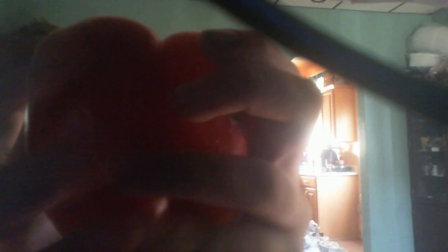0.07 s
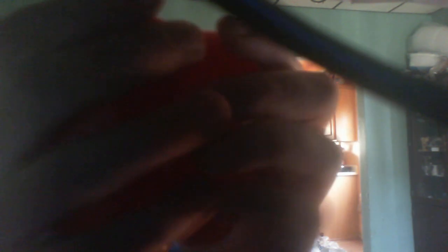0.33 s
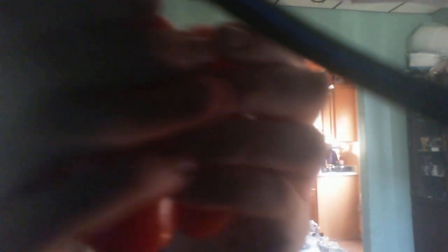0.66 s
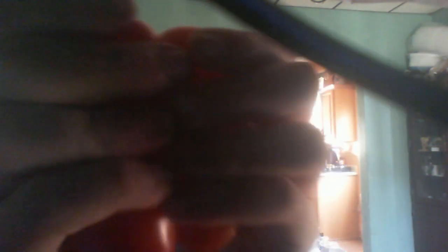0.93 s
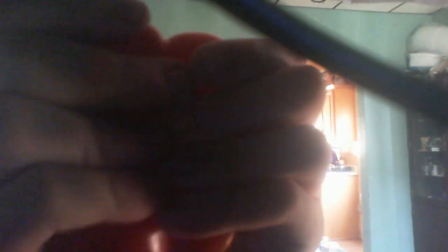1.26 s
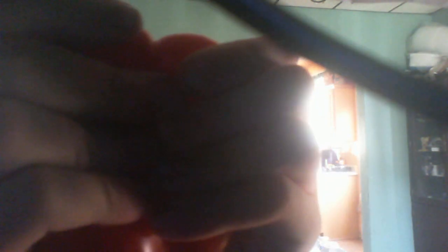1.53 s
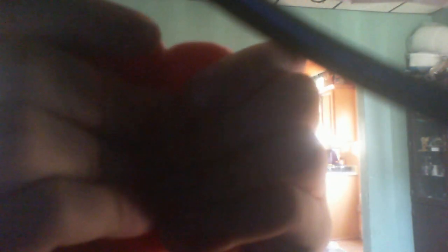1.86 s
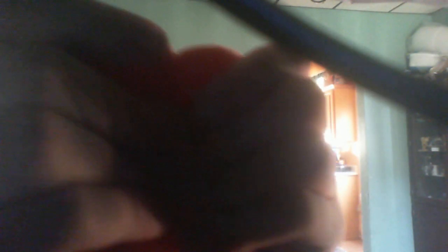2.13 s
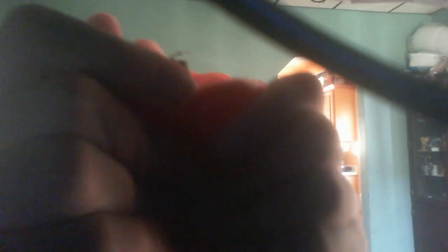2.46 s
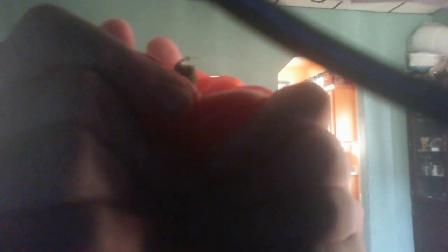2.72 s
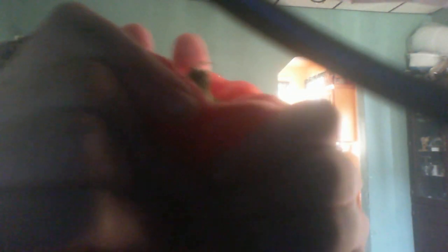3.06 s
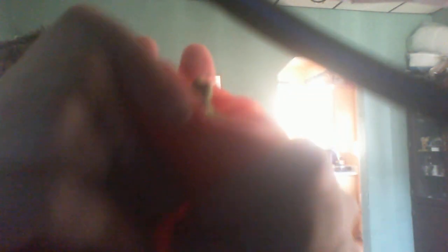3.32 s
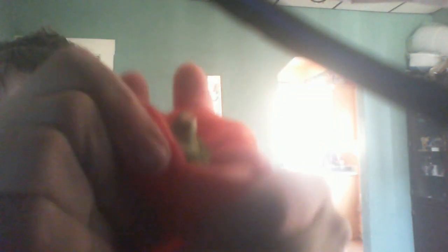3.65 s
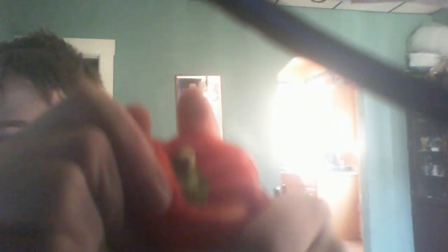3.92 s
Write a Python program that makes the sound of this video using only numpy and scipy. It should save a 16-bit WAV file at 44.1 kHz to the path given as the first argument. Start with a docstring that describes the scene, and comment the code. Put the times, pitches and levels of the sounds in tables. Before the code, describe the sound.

A bell pepper is crushed by hand close to the microphone. After near silence, soft handling rumble and quiet room tone with a faint hum and whine begin at 0.4 seconds. Sparse ticks grow from 1.2 seconds into fine crackling with small hollow cracks. At about 3.2 seconds the pepper rips with one loud snap. Wetter crackles follow, then a brief finger rub and a last crack near 4 seconds.

```python
"""Crushing a bell pepper

Two hands crush a bell pepper close to a small microphone in a quiet room. Its cells burst in a fine
crackle, fibres crack and knock the hollow inside, and the wall finally rips with one loud snap.
The hands rumble softly over room tone, a low electrical hum and a faint whine."""
import sys
import numpy as np
from scipy import signal
from scipy.fft import rfft, irfft, next_fast_len
from scipy.io import wavfile
from scipy.ndimage import map_coordinates

SR = 44100
rng = np.random.default_rng(int(sys.argv[2]) if len(sys.argv) > 2 else 0)


def materialize(psi):
    """Save the field psi as 16-bit PCM at rate SR to the path in sys.argv[1].

    A 1-D psi becomes a single channel; in a 2-D psi each row is a channel.
    """
    bounded = np.clip(np.atleast_2d(psi).T, -1, 1)
    quanta = np.round(bounded * 32767).astype(np.int16)
    wavfile.write(sys.argv[1], SR, quanta)


N = 176400

# tone of the quiet room (frequency [Hz], gain [dB])
ROOM_TONE = [(130, -1), (200, -13), (560, -16.5), (700, -20.5), (900, -33.5), (1100, -30.5), (2300, -37),
             (4300, -46), (15500, -44.5)]
# reverberation of the room (frequency [Hz], time to fall 60 dB [s])
ROOM_T60 = [(2000, 0.2), (10000, 0.12)]
# electrical hum (frequency [Hz], level [dB])
HUM = [(60, -74.5), (91, -72.5), (120, -64), (535, -75.5)]
# electrical whine (pitch [Hz], pitch during a blip [Hz], level [dB])
WHINE = [(914, 775, -72), (1435, 1700, -86)]
# rumble of the hands (time [s], level [dB])
HANDS_LEVEL = [(.45, -49.5), (.7, -63.5), (1.85, -61.5), (2.0, -49.5), (2.25, -56.5), (3.85, -53)]
# tone of that rumble (frequency [Hz], gain [dB])
HANDS_TONE = [(18, 1), (35, -9), (55, -10), (200, -29), (2000, -86.5)]
# fingers sliding on the broken pepper (time [s], level [dB])
SLIDE_LEVEL = [(3.77, -93), (3.82, -62.5), (3.88, -68.5), (3.912, -50.5), (3.95, -69.5)]
# tone of that rubbing (frequency [Hz], gain [dB])
SLIDE_TONE = [(300, -4), (750, 8.5), (980, 2), (1250, 2), (4300, -3.5), (14000, -10)]
# cells bursting in the skin (time [s], level [dB])
SKIN_LEVEL = [(.6, -101), (1.13, -77.5), (1.31, -65), (1.37, -62), (1.55, -62), (1.86, -64.5),
              (1.98, -59.5), (2.08, -61), (2.36, -59), (2.55, -57.5), (2.66, -66.5), (2.9, -62), (3.0, -67),
              (3.11, -62.5), (3.15, -73), (3.18, -51), (3.24, -64.5), (3.3, -85.5), (3.38, -80),
              (3.44, -61), (3.5, -59), (3.56, -71), (3.68, -58.5), (3.79, -72.5), (3.92, -62.5)]
# spray of bursting cells (frequency [Hz], gain [dB])
SPRAY_TONE = [(2000, -24.5), (5500, -10), (7200, -5), (8300, -1.5), (10400, 2.5), (12500, -7.5),
              (15500, -19)]
# spray of wet, open flesh (frequency [Hz], gain [dB])
JUICE_TONE = [(2000, -11.5), (5500, -6), (11000, 1.5), (12500, -5.5), (15500, -18.5)]
# tearing flesh (time [s], level [dB])
FLESH_LEVEL = [(.45, -89), (1.28, -76), (1.37, -68.5), (1.88, -69), (1.99, -61), (2.42, -71), (2.52, -68),
               (2.9, -66), (3.12, -75.5), (3.37, -81.5), (3.48, -64.5), (3.57, -74), (3.7, -72), (3.8, -72)]
# tone of that tearing (frequency [Hz], gain [dB])
FLESH_TONE = [(150, -8), (460, 10), (700, 3), (1000, -7), (1550, 1), (2150, 1), (2900, -4.5), (5300, -6.5),
              (14000, -24.5)]
# sharp ticks of the skin (time [s], level [dB])
TICKS = [(.6205, -72.5), (.819, -66.5), (.844, -73), (.853, -70), (0.9612, -67), (1.0576, -66),
         (1.136, -70.5), (1.465, -56), (1.4949, -54.5), (1.6058, -53.5), (2.4725, -54), (2.7981, -48.5),
         (3.5838, -58), (3.6062, -45), (3.707, -53)]
# cracking fibres, before trims (time [s], pitch [Hz], body [dB], spray [dB], hollow knock [dB])
CRACKS = [(0.8993, 3350, -63, -62, -56.5), (1.189, 1550, -61, -61.5, -52), (1.2335, 3970, -53, -48.5, -50),
          (1.7248, 4600, -49.5, -51, -51.5), (1.776, 1510, -56, -54, -52.5), (1.799, 2100, -54, -70, -71),
          (1.8453, 2060, -57, -59, -55), (2.1062, 2970, -56, -51.5, -60), (2.1151, 2190, -57, -50, -44.5),
          (2.153, 2090, -45, -64, -56), (2.2581, 2000, -50, -53, -49.5), (2.2985, 5000, -44, -47, -47.5),
          (2.336, 3200, -57, -57, -61), (2.396, 2280, -52, -77, -57), (2.437, 5170, -45.5, -59, -47),
          (2.4387, 5350, -42, -41.5, -54), (2.4513, 1730, -52, -50, -46.5), (2.7509, 5100, -53, -59.5, -74),
          (2.7812, 5670, -57, -51.5, -65), (3.495, 5340, -53.5, -51, -75),
          (3.5039, 5500, -47.5, -54.5, -55.5), (3.5444, 4700, -53.5, -73, -72),
          (3.6483, 6640, -52, -52, -75), (3.6665, 6000, -57, -49, -63), (3.7233, 5430, -49, -51.5, -82),
          (3.7496, 6200, -52, -58.5, -70), (3.9714, 1220, -44, -52, -49)]
# a fibre splitting (frequency [Hz], gain [dB])
SPLIT_TONE = [(200, -10), (550, -3), (950, -9), (1400, -1.5), (3000, 1), (6000, -6.5), (7500, -7.5),
              (15000, -22.5)]
# stages of the big rip, before the trim (time [s], length [s], body [dB], spray [dB])
RIP_STAGES = [(3.1615, .0007, -25, -24), (3.1643, .001, -22, -32), (3.1655, .0055, -26, -27),
              (3.1718, .0055, -30, -25), (3.179, .005, -38, -36)]
# body of the rip (frequency [Hz], gain [dB])
RIP_TONE = [(300, -8.5), (900, -16), (1150, -6), (4500, -3.5), (5700, 4), (7200, -11.5), (15000, -26)]
# the hollow inside, rung by the rip (time [s], pitch [Hz], peak [dB], swell [s], decay [s])
HOLLOW = [(3.1645, 627, -28.5, .003, .0027), (3.1725, 604, -29.5, .004, 0.0028),
          (3.184, 522, -48.5, .006, 0.013)]

SKIN_PER_S, FLESH_PER_S, SIZE_SPREAD_DB = 9000, 2500, 2.5  # tiny bursts and the scatter of their size
CLICK_S = .005  # span over which a click's level is reckoned
TIME = np.arange(N) / SR


def amp(db):
    """Decibels to gain."""
    return 10 ** (np.asarray(db) / 20)


def unit(x):
    """Scale to rms 1."""
    return x / np.sqrt(np.mean(x ** 2) + 1e-20)


def sized(x, db, span):
    """Give x the energy of a sound of level db lasting span seconds."""
    return x * amp(db) * np.sqrt(span * SR / (np.sum(x ** 2) + 1e-20))


def along(points, hz):
    """Interpolate (frequency [Hz], value) points on a log axis."""
    f, v = np.transpose(points)
    return np.interp(np.log(hz + 1), np.log(f + 1), v)


def fader(rows):
    """One gain per sample from (time [s], level [dB]) rows."""
    return amp(np.interp(TIME, *np.transpose(rows)))


def wobble(rate):
    """A smooth random curve, rate knots a second."""
    return map_coordinates(rng.standard_normal(4096), [TIME * rate], mode="wrap")


def colour(x, points, size=8192):
    """Minimum-phase filter through (frequency [Hz], gain [dB]) points."""
    cepstrum = irfft(np.log(amp(along(points, np.fft.rfftfreq(size, 1 / SR)))))
    cepstrum[1:size // 2] *= 2
    cepstrum[size // 2 + 1:] = 0
    return signal.fftconvolve(x, irfft(np.exp(rfft(cepstrum))))[:len(x)]


def bursts(rate, spread_db, size=N):
    """Random impulses of scattered strength, rate a second."""
    impulses = (rng.random(size) < rate / SR) * rng.choice([-1, 1], size)
    return impulses * amp(spread_db * np.clip(rng.standard_normal(size), -2, 2))


def add(track, s, x):
    """Mix x in at time s."""
    part = track[round(s * SR):][:len(x)]
    part += x[:len(part)]


def room_tone(level_db=-56):
    """The steady, low noise of the quiet room."""
    return amp(level_db) * unit(colour(rng.standard_normal(N), ROOM_TONE))


def hum():
    """A low electrical hum, each tone slightly unsteady in phase."""
    return sum(amp(db) * unit(np.sin(2 * np.pi * hz * TIME + .37 * wobble(5.03))) for hz, db in HUM)


def whine(blips_per_s=15.02, blip_at_s=.428, blip_share=.24):
    """Electronics whine faintly, their pitch blipping aside at a steady rate."""
    cycle = ((TIME - blip_at_s) * blips_per_s + .5) % 1 - .5
    in_blip = abs(cycle) < blip_share / 2
    out = np.zeros(N)
    for hz, blip_hz, db in WHINE:
        phase = 2 * np.pi * np.cumsum(np.where(in_blip, blip_hz, hz)) / SR
        out += amp(db) * unit(np.sin(phase + wobble(27)))
    return out


def hands():
    """The hands rumble softly, close to the microphone."""
    return unit(colour(rng.standard_normal(N), HANDS_TONE)) * fader(HANDS_LEVEL)


def squeak(peak_s=.45, half_length_s=.045, hz=4370, level_db=-81, rough_hz=754):
    """A fingertip gives a short, rough squeak as the grip tightens."""
    swell = np.exp(-((TIME - peak_s) / half_length_s) ** 2)
    return amp(level_db) * swell * unit(np.sin(2 * np.pi * hz * TIME + 2 * wobble(rough_hz)))


def slide():
    """Fingers rub over the skin as the hands take a new grip."""
    rub = unit(colour(bursts(SKIN_PER_S, SIZE_SPREAD_DB), SLIDE_TONE))
    return rub * fader(SLIDE_LEVEL) * (TIME > SLIDE_LEVEL[0][0])


def pops(per_s=200, centre_hz=6960, decay_cycles=1.3, spread_db=4, top_hz=11100, size=256):
    """Larger cells burst one by one, each a tiny click with its own pitch."""
    out, t = np.zeros(N), np.arange(size) / SR
    times = TIME[rng.random(N) < per_s / SR]
    for s, (pitch, strength) in zip(times, rng.uniform(-1.7, 1.7, (len(times), 2))):
        hz = centre_hz * np.exp(.26 * pitch)
        ring = np.sin(2 * np.pi * hz * t) + .5 * rng.standard_normal(size)
        add(out, s, sized(ring * np.exp(-t * hz / decay_cycles), spread_db * strength, CLICK_S))
    return unit(signal.sosfilt(signal.butter(4, top_hz, fs=SR, output="sos"), out))


def crackle(spurts_per_s=140, spurt_decay_s=.0046, steady_fizz=.3, pops_db=-4):
    """Cells of skin and flesh give way in short, sharp spurts; from the rip on, the spray is wetter."""
    decay = np.exp(-TIME[:SR // 20] / spurt_decay_s)
    spurt_power = signal.fftconvolve(bursts(spurts_per_s, spread_db=2.6) ** 2, decay ** 2)[:N]
    spurts = np.sqrt(abs(spurt_power) + steady_fizz ** 2)
    cells = bursts(SKIN_PER_S, SIZE_SPREAD_DB) * spurts
    before_rip = TIME < RIP_STAGES[0][0]
    skin = np.where(before_rip, unit(colour(cells, SPRAY_TONE)), unit(colour(cells, JUICE_TONE)))
    flesh = unit(colour(bursts(FLESH_PER_S, SIZE_SPREAD_DB) * spurts, FLESH_TONE))
    return (skin + amp(pops_db) * pops()) * fader(SKIN_LEVEL) + flesh * fader(FLESH_LEVEL)


def ticks(decay_s=.00055, size=1024):
    """The skin gives way in tiny, sharp, wet ticks."""
    out, t = np.zeros(N), np.arange(size) / SR
    for s, db in TICKS:
        burst = rng.standard_normal(size) * np.exp(-t / decay_s)
        add(out, s, sized(colour(burst, JUICE_TONE, size), db, CLICK_S))
    return out


def cracks(ring_cycles=3, split_s=.001, spray_s=.0013, knock_s=.0026, closed_hz=506, torn_hz=724):
    """Each fibre splits with a short ring, a spray of bursting cells and a knock of the hollow."""
    size = 1024
    out, t = np.zeros(N), np.arange(size) / SR
    for s, hz, body_db, spray_db, knock_db in CRACKS:
        ring = np.sin(2 * np.pi * hz * t) * np.exp(-t * hz / ring_cycles)
        split = colour(rng.standard_normal(size) * np.exp(-t / split_s), SPLIT_TONE, size)
        spray = colour(rng.standard_normal(size) * np.exp(-t / spray_s), SPRAY_TONE, size)
        hollow_hz = closed_hz if s < RIP_STAGES[-1][0] else torn_hz  # higher once torn open
        hollow_hz *= np.exp(.095 * rng.standard_normal())
        knock = np.sin(2 * np.pi * hollow_hz * t) * np.exp(-t / knock_s)
        trimmed = [(ring, body_db - 1.5), (split, body_db - 4.5), (spray, spray_db - 1.5)]
        add(out, s, sum(sized(x, db, CLICK_S) for x, db in trimmed) + sized(knock, knock_db, CLICK_S))
    return out


def snap(bursts_per_s=9000, spread_db=2, trim_db=-1, size=4096):
    """A rip races through the pepper's wall in a few stages, knocking the hollow inside."""
    out, t = np.zeros(N), np.arange(size) / SR
    for s, length, body_db, spray_db in RIP_STAGES:
        body = colour(bursts(bursts_per_s, spread_db, size) * (t < length), RIP_TONE)
        spray = colour(bursts(bursts_per_s, spread_db, size) * (t < length), SPRAY_TONE)
        add(out, s, sized(body, body_db + trim_db, length) + sized(spray, spray_db + trim_db, length))
    for s, hz, db, swell, decay in HOLLOW:
        envelope = np.minimum(t / swell, 1) * np.exp(-np.maximum(t - swell, 0) / decay)
        add(out, s, amp(db) * np.sin(2 * np.pi * hz * t) * envelope)
    return out


def room(x, near_db=-9, near_s=.0044, tail_db=-14.5):
    """Heard from close up: the direct sound, quick echoes off the hands, then the room's faint tail."""
    hz, s, spectrum = signal.stft(rng.standard_normal(SR // 2), SR, nperseg=256)
    decay = amp(-60 * s / along(ROOM_T60, hz)[:, None])
    tail = signal.istft(spectrum * decay, SR, nperseg=256)[1]
    t = np.arange(len(tail)) / SR
    near = rng.standard_normal(len(t)) * t * np.exp(-2 * t / near_s)
    echoes = amp(tail_db) * tail / np.linalg.norm(tail) + amp(near_db) * near / np.linalg.norm(near)
    return x + signal.fftconvolve(x, echoes)[:N]


def scene():
    """The pepper right at the microphone, the quiet room behind it, in mono."""
    pepper = room(cracks() + ticks() + crackle() + slide() + squeak()) + room(snap())
    return (pepper + hands() + room_tone() + hum() + whine())[None]


def record(dry, wake_s=.2, wake_db=-33, open_s=.411, click_db=-49.5, click_decay_s=.02, top_hz=15850):
    """The microphone opens faintly, then fully with a small click, and keeps nothing above top_hz."""
    click = amp(click_db) * np.exp(-abs(TIME - open_s) / click_decay_s)
    live = np.where(TIME > open_s, dry + click, dry * amp(wake_db) * (TIME > wake_s))
    padded = next_fast_len(N + SR // 2)
    in_band = np.fft.rfftfreq(padded, 1 / SR) < top_hz
    return irfft(rfft(live, padded) * in_band, padded)[..., :N]


dry = scene()
out = record(dry)
materialize(out)
```